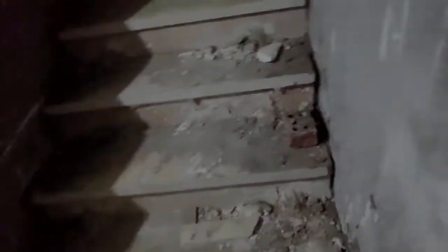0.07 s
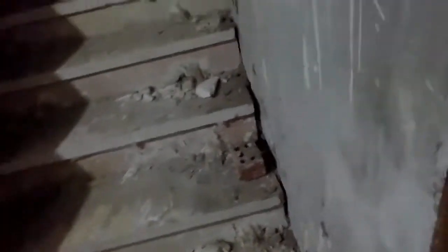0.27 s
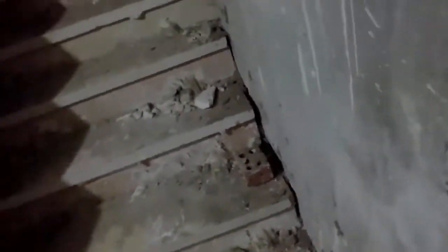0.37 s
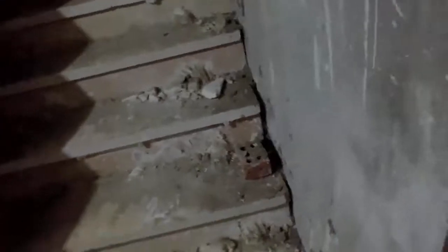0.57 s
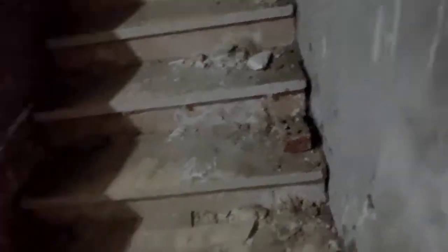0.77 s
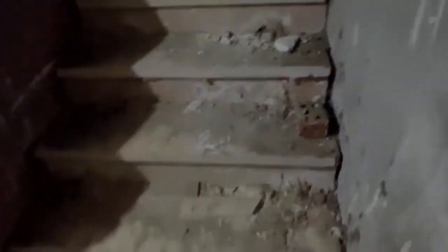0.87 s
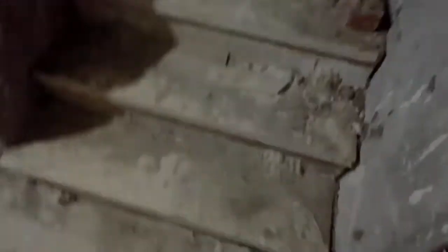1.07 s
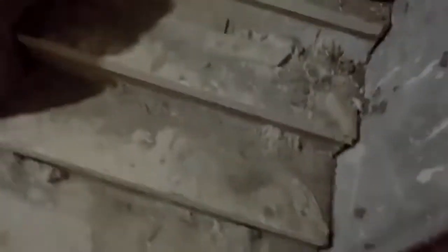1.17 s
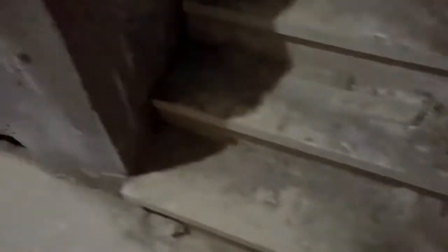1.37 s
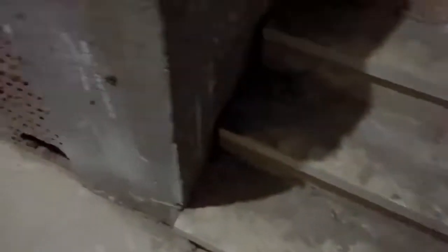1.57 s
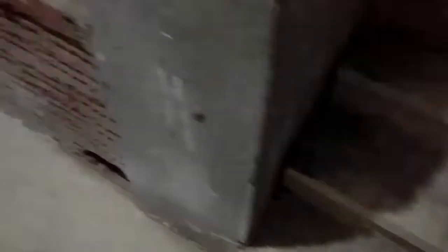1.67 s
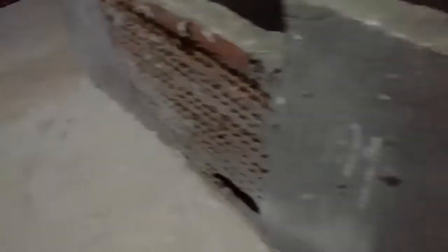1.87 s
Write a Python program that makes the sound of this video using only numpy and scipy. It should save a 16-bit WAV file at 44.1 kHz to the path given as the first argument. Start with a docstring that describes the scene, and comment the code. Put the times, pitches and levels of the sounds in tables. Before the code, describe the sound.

A wooden door slams hard in a concrete stairwell, booming, followed by faint clicks and clothing rustle.

```python
"""A wooden door slams in a concrete stairwell: the latch rides over its plate, the leaf hits the frame
and knocks back once. Blows are decaying noise with early reflections and a tail, rung through resonances;
decaying sines make the panel's thump, the clack and the stairwell's boom. A scrape and a faint moan come first;
small clicks follow, then scuffs, and clothing ticks and rustles as filtered noise, with a fainter moan
late among the rustles. Rumble and hum lie beneath."""
import sys
import numpy as np
from scipy import signal
from scipy.fft import rfft, irfft
from scipy.io import wavfile
from scipy.ndimage import uniform_filter1d

SR = 44100
rng = np.random.default_rng(int(sys.argv[2]) if len(sys.argv) > 2 else 0)


def dump(signal):
    """Clip the signal to [-1, 1] and save it as 16-bit WAV at the path in sys.argv[1]."""
    limited = np.clip(np.atleast_2d(signal).T, -1, 1)
    pcm = np.round(limited * 32767).astype(np.int16)
    wavfile.write(sys.argv[1], SR, pcm)


N = 85995
T = np.arange(N) / SR
HZ = np.fft.rfftfreq(2 * N, 1 / SR)  # zero padding to 2N keeps the filters from wrapping round


def amp(db):
    """Level definition: decibels to an amplitude ratio."""
    return 10 ** (np.asarray(db) / 20)


def read(points, hz):
    """Logarithmic frequency scale: interpolates a table along it."""
    f, value = np.transpose(points)
    return np.interp(np.log(hz + 1), np.log(f), value)


def evened(x):
    """Mean power: scales to rms 1."""
    return x / np.sqrt(np.mean(x ** 2) + 1e-20)


def unit(x):
    """Signal energy: scales each channel to energy 1."""
    return x / np.linalg.norm(x, axis=-1, keepdims=True)


def fade(t, t60):
    """Exponential decay: the level falls 60 dB in t60 seconds."""
    return np.exp(-np.log(1000) * t / t60)


def add(mix, s, sound):
    """Superposition: adds a sound from time s onward."""
    part = mix[:, round(s * SR):]
    part += sound[..., :part.shape[1]]


def colour(x, tone):
    """Minimum phase: a causal filter whose phase follows from its log gain by the Hilbert transform."""
    two_sided_hz = abs(np.fft.fftfreq(2 * N, 1 / SR))
    log_gain = np.log(amp(read(tone, two_sided_hz)))
    response = np.exp(np.conj(signal.hilbert(log_gain)))[:N + 1]
    return irfft(rfft(x, 2 * N) * response)[:, :N]


# likeness of the two channels: f/Hz, left-right correlation
CORRELATION = [(30, 0.67), (130, 0.83), (280, 0.91), (520, 0), (1100, 0.27), (2200, 0), (15000, 0)]
# lean to the left, before scaling by side: f/Hz, left minus right level/dB
LEFT_LEAN = [(100, -4), (600, 1.5), (1100, 1), (2000, -.5), (3000, 3), (4500, 6.5), (9000, 6.5), (15000, 6)]
LEAD_S, LEAD_ABOVE_HZ = .0004, 2300  # the treble reaches the left microphone first


def place(x, side):
    """Interchannel coherence, level and time difference: two unrelated noises become a stereo pair."""
    a, b = rfft(x, 2 * N)
    turn = np.arccos(np.clip(read(CORRELATION, HZ), -1, 1)) / 2
    lean = amp(side * read(LEFT_LEAN, HZ) / 2)
    common, opposed = a * np.cos(turn), b * np.sin(turn)
    lag_s = LEAD_S * np.tanh((HZ / LEAD_ABOVE_HZ) ** 2)
    left = (common + opposed) * lean
    right = (common - opposed) * np.exp(-2j * np.pi * HZ * lag_s) / lean
    return irfft(np.array([left, right]))[:, :N]


# low hum, peak level of each tone: f/Hz, level/dB
HUM_TONES = [(35.5, -60), (70.5, -58), (141, -65.5)]
# spectrum of the building's rumble: f/Hz, level/dB
RUMBLE_TONE = [(20, -5.5), (36, 0), (55, -5), (100, -17), (200, -22.5), (400, -30), (2000, -42),
               (8000, -50), (11000, -57.5), (15000, -67.5)]
RUMBLE_DB = -54  # rms


def air():
    """Stationary background: the building's rumble as coloured noise, and a hum of steady sines."""
    hum = sum(amp(db) * np.sin(2 * np.pi * (hz * T + rng.random())) for hz, db in HUM_TONES)
    rumble = place(colour(rng.standard_normal((2, N)), RUMBLE_TONE), side=.2)
    return hum + amp(RUMBLE_DB) * evened(rumble)


GRAINS_PER_S, GRAIN_SPREAD_DB, GRAIN_SHARE = 1400, -0.5, 0.2


def rubbing(levels, tone, side):
    """Friction: many tiny random contacts, heard as grains in a soft hiss."""
    strikes = rng.random((2, N)) < GRAINS_PER_S / SR
    strength = amp(GRAIN_SPREAD_DB * np.minimum(rng.exponential(1, (2, N)), 4))
    grains = rng.standard_normal((2, N)) * strikes * strength
    rub = GRAIN_SHARE * evened(grains) + rng.standard_normal((2, N))
    envelope = amp(np.interp(T, *np.transpose(levels)))
    return evened(place(colour(rub, tone), side)) * envelope


# scrape as the door swings to: t/s, level/dB
SWING_LEVEL = [(0, -48.5), (.11, -46), (.145, -38), (.18, -42), (.25, -54.5), (.4, -89)]
# spectrum of the scrape: f/Hz, level/dB
SWING_TONE = [(60, -0.5), (200, 6.5), (400, 0.5), (900, 1.5), (1900, -0.5), (3000, -5.5), (4200, -6.5),
              (5800, -4.5), (8000, -11.5), (12000, -12), (15000, -17.5)]


def swing():
    """Sliding friction: the door scrapes as it swings to."""
    return rubbing(SWING_LEVEL, SWING_TONE, side=2.4)


# faint narrow moans: start t/s, length/s, f/Hz at the start, glide/(Hz/s), peak level/dB
MOAN_TONES = [(-.08, 0.21, 294.3, 102, -46), (1.48, 0.16, 355, 150.2, -59.5)]
MOAN_WAVER = .015  # rms share of the pitch


def moans():
    """Frequency modulation: faint gliding, wavering tones, as of a dry hinge."""
    out = np.zeros(N)
    for start, length, hz, glide, db in MOAN_TONES:
        waver = MOAN_WAVER * evened(uniform_filter1d(rng.standard_normal(N), size=400))
        pitch = (hz + glide * (T - start)) * (1 + waver)
        swell = np.sin(np.pi * np.clip((T - start) / length, 0, 1))
        out += amp(db) * swell * np.sin(2 * np.pi * np.cumsum(pitch) / SR)
    return out


# reverberation of the stairwell: f/Hz, t60/s
TAIL_T60 = [(60, 1.8), (170, 1.05), (300, 0.56), (500, 0.71), (1000, 0.79), (2000, .64), (4000, .5),
            (8000, .45), (15000, .33)]
EARLY_T60, ROOM_RISE_S = 0.22, 0.004


def stairwell():
    """Diffuse reverberation: noise whose decay time depends on frequency, shortest in the top treble."""
    hz, t, z = signal.stft(rng.standard_normal((2, N)), SR, nperseg=256)
    decaying = z * fade(t, read(TAIL_T60, hz)[:, None])
    tail = signal.istft(decaying, SR, nperseg=256)[1][:, :N]
    return unit(tail * (1 - np.exp(-T / ROOM_RISE_S)))


def blows(rows, tone, crack, early_db, room_db, side):
    """Impact: a crack and a short clatter, then early reflections and the stairwell's tail."""
    out = np.zeros((2, N))
    for s, db, t60 in rows:
        clatter, early = rng.standard_normal((2, 2, N))
        direct = unit(clatter * fade(T, t60))
        direct[0, 0] += crack  # one-sample impulse
        early = unit(early * fade(T, EARLY_T60) * (1 - np.exp(-T / ROOM_RISE_S)))
        add(out, s, amp(db) * (direct + amp(early_db) * early + amp(room_db) * stairwell()))
    return place(colour(out, tone), side)


def resonant(x, modes):
    """Resonance: a body lifts and prolongs its own frequencies in the sound passing through."""
    body = 1 + sum(amp(db) / (1 + 2j * np.pi * (HZ - hz) * t60 / np.log(1000)) for hz, db, t60 in modes)
    return irfft(rfft(x, 2 * N) * body)[:, :N]


def ring(modes, start, rise_s):
    """Modal decay: sines of alternating sign swell quickly and ring out, alike in both channels."""
    t = np.maximum(T - start, 0)
    out = np.zeros(N)
    for k, (hz, db, t60) in enumerate(modes):
        out += (-1) ** k * amp(db) * fade(t, t60) * np.sin(2 * np.pi * hz * t)
    return (1 - np.exp(-t / rise_s)) * out


# resonances of the leaf and its fittings: f/Hz, level/dB over the clatter, t60/s
LEAF_MODES = [(411.6, 3, 0.41), (517, 3, 0.34), (693, -10.5, 0.45), (896, 1.5, 0.75), (1036, -3, 0.23),
              (1128.3, 0, .15), (1293, -4.5, 0.091), (1406, -0.5, 0.29), (1465, 4.5, 0.22), (1743, 3, 0.13),
              (1990, 3.5, .15), (3010, 1.5, 0.23), (3850, 1.5, 0.12), (6300, 2, .05)]


def leaf(x):
    """Forced vibration: the wooden leaf and its fittings ring with the blow."""
    return resonant(x, LEAF_MODES)


# latch and door edge striking the plate: t/s, relative level/dB, clatter t60/s
LATCH_BLOWS = [(.1855, -9, .06), (.196, -8, .05), (.2015, -4, 0.032), (.2125, -7.5, .04), (.216, -5, 0.079),
               (.2225, -6.5, .05), (.2275, -3.5, 0.03), (.2305, -0.5, .05)]
# spectrum of the latch blows: f/Hz, level/dB
LATCH_COLOUR = [(60, -9.5), (300, 0), (650, -1.5), (1150, 0.5), (1500, -4.5), (1850, -2), (2400, -10.5),
                (3600, -10), (6300, -18), (9000, -24.5), (15000, -27)]


def latch():
    """Repeated impact: the latch rides over its plate in a quick run of blows."""
    hits = blows(LATCH_BLOWS, LATCH_COLOUR, crack=0.21, early_db=-5.5, room_db=-8.5, side=0.81)
    return leaf(amp(20.5) * hits)


# the panel's thump as the latch meets the plate: f/Hz, level/dB, t60/s
PANEL_MODES = [(153, 4, 0.092), (184, -17, 0.23), (67, -16.5, .15)]


def panel():
    """Plate vibration: the door panel thumps in its low modes."""
    return ring(PANEL_MODES, start=.2105, rise_s=0.014)


# air modes of the stairwell, the pair near 55 Hz beating slowly: f/Hz, level/dB, t60/s
AIR_MODES = [(54.32, -7, .92), (55.27, -6, 0.94), (47, -12.5, 0.48), (84.3, -15.5, 0.91),
             (97.8, -22.5, 0.92), (141.8, -20, 0.84), (164.3, -11, 0.83), (194.7, -23, 0.88),
             (206, -29.5, 1), (223.3, -26, 1), (261.8, -22.5, 0.88), (333, -28, 0.69), (57.7, -33, 2.4)]


def boom():
    """Standing waves: the stairwell's air modes, set off by the slam, swell and die away."""
    return ring(AIR_MODES, start=.258, rise_s=0.018)


# leaf hitting the frame and shuddering: t/s, relative level/dB, clatter t60/s
SLAM_BLOWS = [(.267, 2, 0.055), (.2735, -4.5, 0.12), (.282, -6, .05), (.29, -4, 0.036),
              (.296, -11.5, 0.042)]
# spectrum of the slam: f/Hz, level/dB
SLAM_COLOUR = [(30, 5), (120, 3), (300, 10), (520, 3), (750, -5), (1150, -2.5), (1700, -9.5), (3600, -15),
               (6300, -25.5), (9000, -30.5), (15000, -35.5)]


def slam():
    """Collision: the leaf hits the frame and shudders."""
    hits = blows(SLAM_BLOWS, SLAM_COLOUR, crack=.2, early_db=-2.5, room_db=-4, side=.95)
    return leaf(amp(18.5) * hits)


# leaf knocking back against the bolt: t/s, relative level/dB, clatter t60/s
KNOCK_BLOWS = [(.319, -6, .03), (.3215, -5.5, .03), (.331, -10.5, .05), (.348, -12.5, 0.076),
               (.368, -17, .04)]
# spectrum of the knock: f/Hz, level/dB
KNOCK_COLOUR = [(80, -7), (260, -5.5), (470, -4.5), (620, 7), (800, 2.5), (1000, 4.5), (1300, 2),
                (1550, -2.5), (2200, -10.5), (4000, -25.5), (8000, -31), (15000, -35)]


def knock():
    """Rebound: the leaf knocks back against the bolt."""
    hits = blows(KNOCK_BLOWS, KNOCK_COLOUR, crack=.2, early_db=-16, room_db=-9, side=.8)
    return leaf(amp(22.5) * hits)


# hollow clack of the knock: f/Hz, level/dB, t60/s
CLACK_MODES = [(620, -22, .04), (1100, -20, .03), (1300, -15, .03), (1500, -20, .025)]


def clack():
    """Heavily damped modes: the hollow clack of the knock."""
    return ring(CLACK_MODES, start=.3192, rise_s=0.00094)


# small clicks of the hardware: t/s, relative level/dB, clatter t60/s
CLICK_BLOWS = [(.4577, -0.5, 0.023), (.468, -3.5, 0.045), (.5311, -3.5, .015), (.5999, -10, .015)]
# spectrum of the clicks: f/Hz, level/dB
CLICK_COLOUR = [(200, -53), (1000, -31.5), (2500, -32.5), (4000, -39.5), (5600, -44.5), (6700, -46.5),
                (7600, -48), (11000, -54), (15000, -69)]
# the steel bolt's ring: f/Hz, level/dB over the click, t60/s
BOLT_MODES = [(4050, 2, .03), (6700, 9, .03)]


def clicks():
    """Impact and resonance: small clicks of the hardware ring the steel bolt."""
    hits = blows(CLICK_BLOWS, CLICK_COLOUR, crack=.5, early_db=-12, room_db=-15, side=1.1)
    return resonant(amp(23) * hits, BOLT_MODES)


# soft scuffs: t/s, relative level/dB, t60/s
SCUFF_BLOWS = [(.885, -7, .12), (.9302, 0, 0.105), (.988, -6.5, 0.11)]
# spectrum of the scuffs: f/Hz, level/dB
SCUFF_COLOUR = [(40, -19), (150, -8.5), (230, -23.5), (400, -49), (1200, -43), (4000, -49), (9000, -61),
                (15000, -62)]


def scuffs():
    """Damped noise bursts: soft scuffs, as of a shoe on a dusty step."""
    return amp(17) * blows(SCUFF_BLOWS, SCUFF_COLOUR, crack=0.15, early_db=-6.5, room_db=-11.5, side=0.35)


# crisp ticks of clothing: t/s, relative level/dB, t60/s
TICK_BLOWS = [(1.2085, -6.5, .12), (1.2564, -2.5, .08), (1.2928, -2, .05), (1.3078, 2.5, .015),
              (1.3472, 0.5, .06)]
# spectrum of the ticks: f/Hz, level/dB
TICK_COLOUR = [(60, -77), (300, -54), (2000, -33.5), (5000, -36.5), (9000, -36), (15000, -38)]


def ticks():
    """Brief impulses: crisp ticks of clothing."""
    return amp(9.5) * blows(TICK_BLOWS, TICK_COLOUR, crack=.25, early_db=-2, room_db=-6, side=1.4)


# rustle of clothing: t/s, level/dB
RUSTLE_LEVEL = [(.6, -84), (1.17, -76.5), (1.22, -63), (1.33, -60), (1.40, -46.5), (1.452, -42),
                (1.48, -46), (1.53, -46), (1.61, -50), (1.645, -48), (1.69, -51), (1.755, -47.5),
                (1.82, -52), (1.87, -49.5), (1.95, -57)]
# spectrum of the rustle: f/Hz, level/dB
RUSTLE_COLOUR = [(25, -40), (100, -24), (200, -6.5), (350, -2), (700, 3), (1050, 1), (1450, 5.5),
                 (2600, 2.5), (5500, -3), (8000, -7.5), (12000, -11.5), (15000, -17)]


def rustle():
    """Friction of cloth: clothing rustles by the microphone."""
    return rubbing(RUSTLE_LEVEL, RUSTLE_COLOUR, side=1.4)


def scene():
    """Superposition: everything that sounds in the stairwell, summed."""
    background = air() + swing() + moans()
    door = latch() + panel() + boom() + slam() + knock() + clack() + clicks()
    walker = scuffs() + ticks() + rustle()
    return background + door + walker


QUIET_DB, OPEN_DB, DUCK_DB = -46.5, -26.5, -10.5  # noise suppressor: shut below, open above, depth
EDGE_HZ = 15700


def record(dry):
    """Downward expansion: a noise suppressor turns quiet stretches down; then a low-pass limits the band."""
    power = uniform_filter1d((dry ** 2).mean(0), size=1600)
    level_db = 10 * np.log10(abs(power) + 1e-12)
    shut = np.clip((OPEN_DB - level_db) / (OPEN_DB - QUIET_DB), 0, 1)
    out = dry * amp(DUCK_DB * uniform_filter1d(shut, size=800))
    low_pass = signal.firwin(511, EDGE_HZ, window=("kaiser", 9), fs=SR)
    return signal.oaconvolve(out, low_pass[None], "same")


dry = scene()
out = record(dry)
dump(out)
```